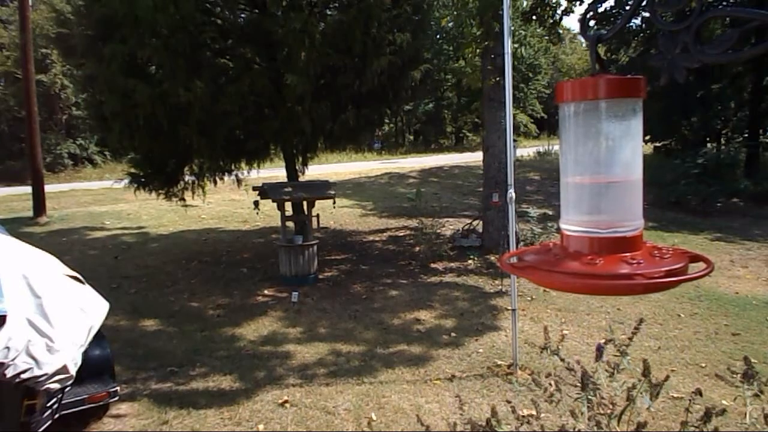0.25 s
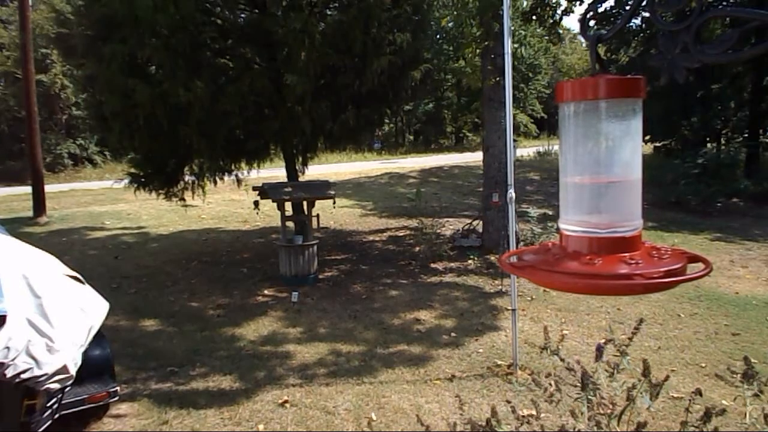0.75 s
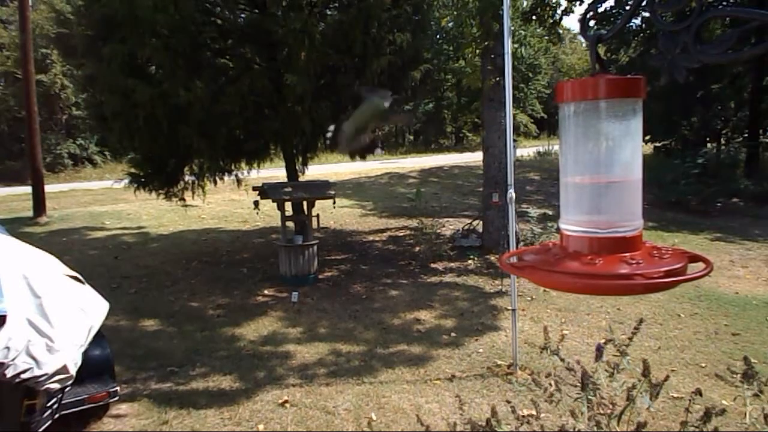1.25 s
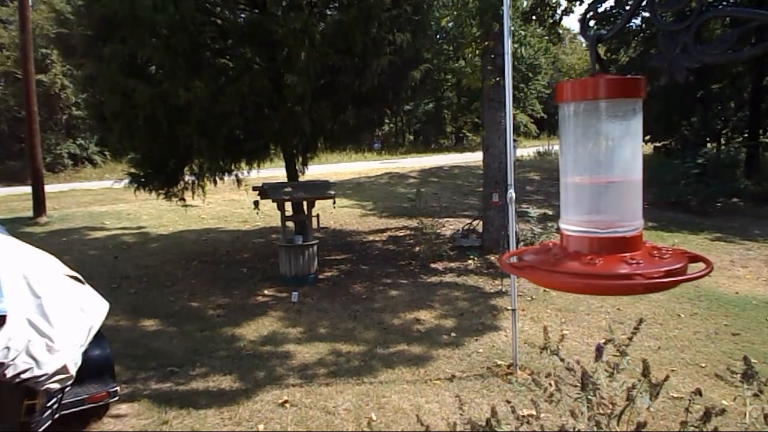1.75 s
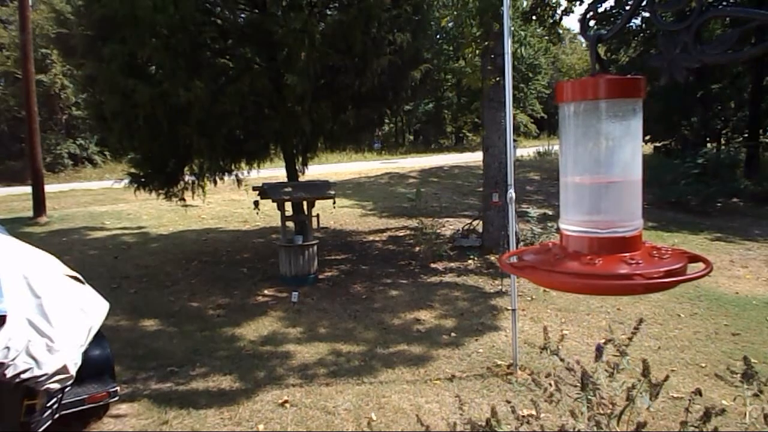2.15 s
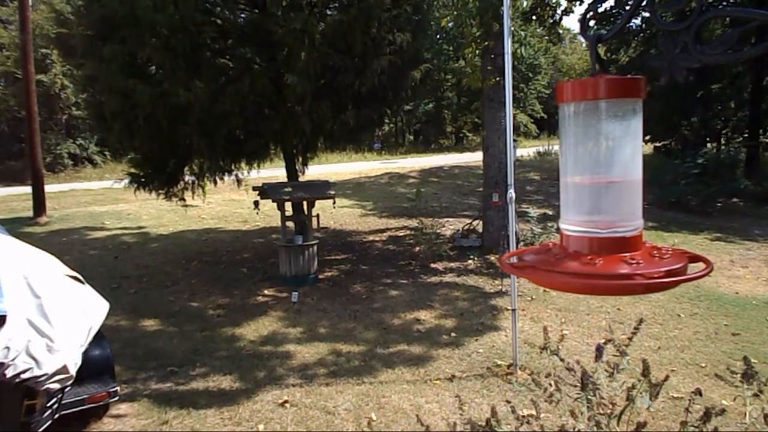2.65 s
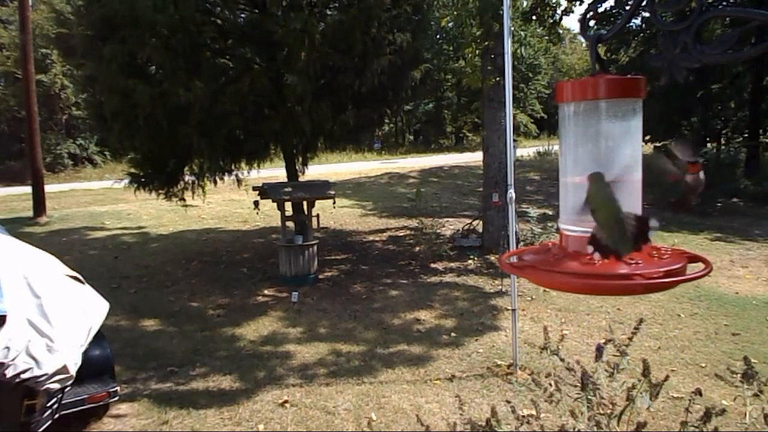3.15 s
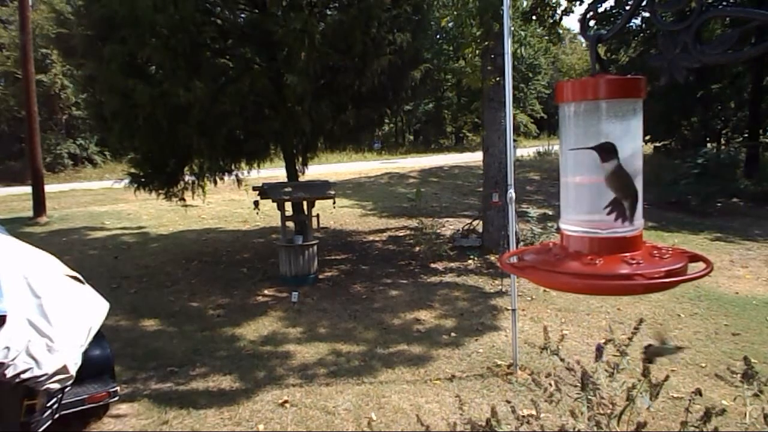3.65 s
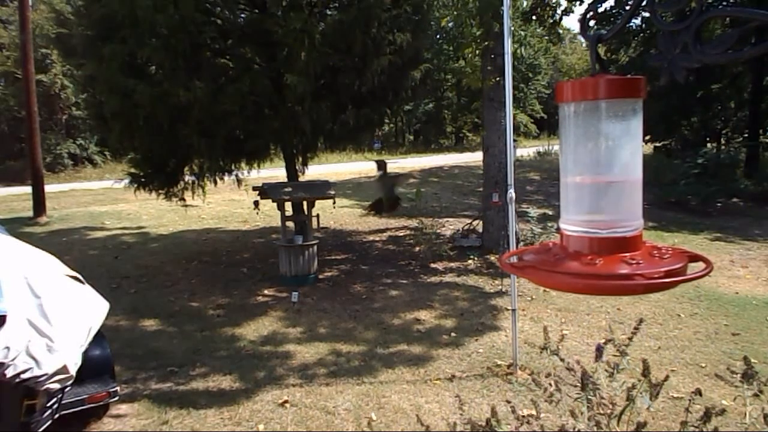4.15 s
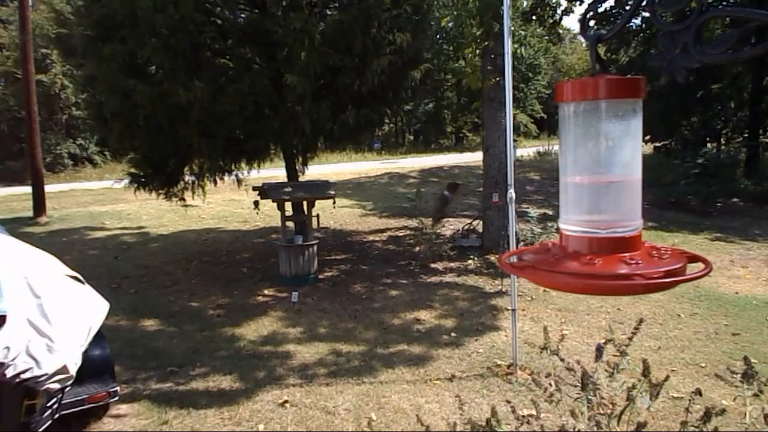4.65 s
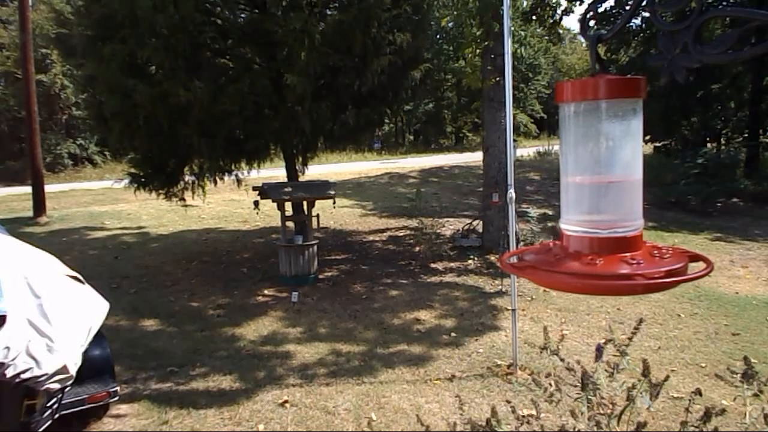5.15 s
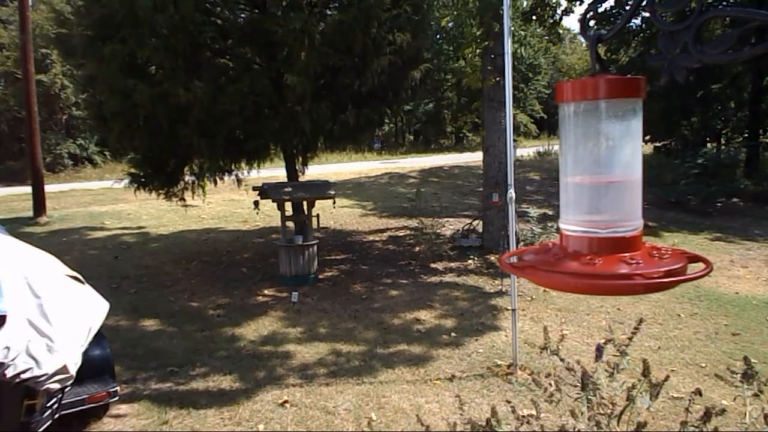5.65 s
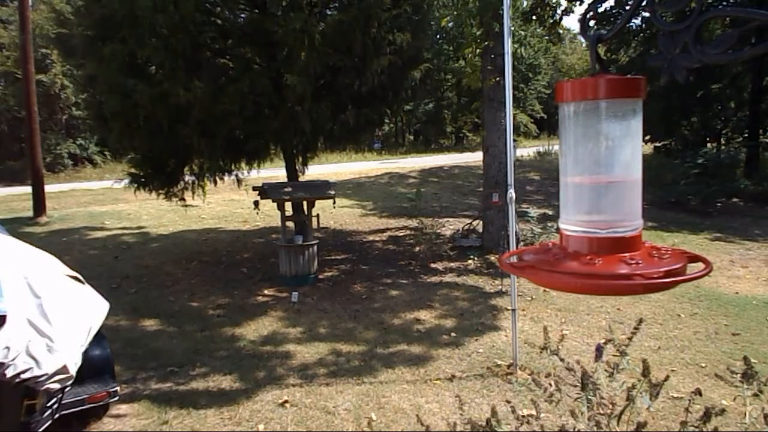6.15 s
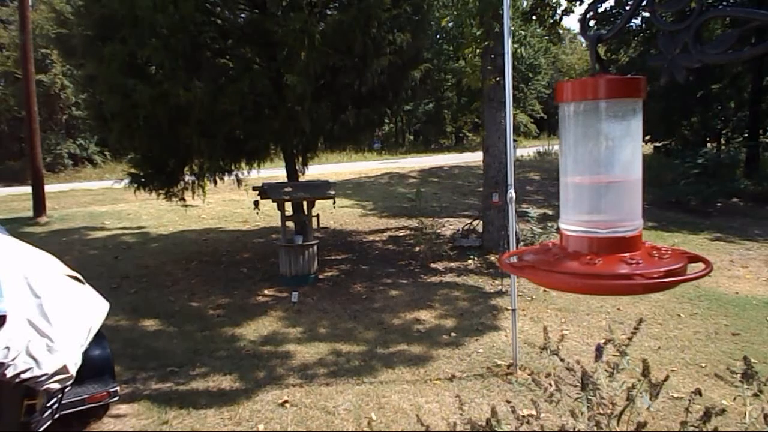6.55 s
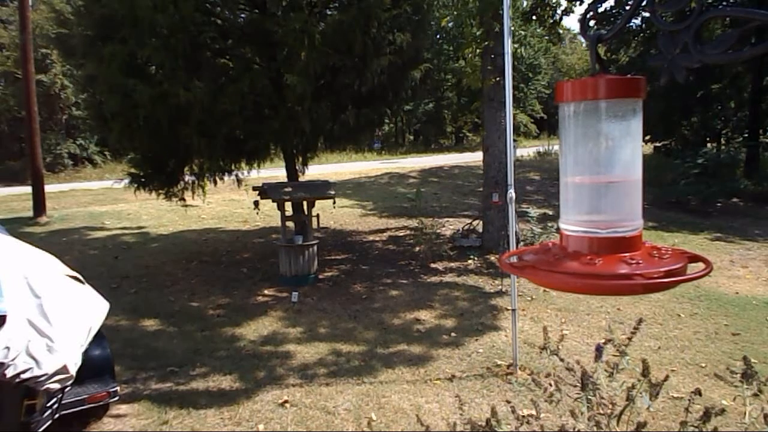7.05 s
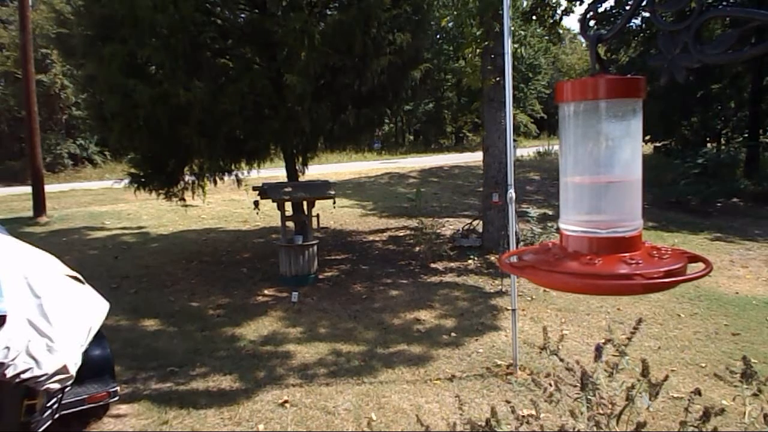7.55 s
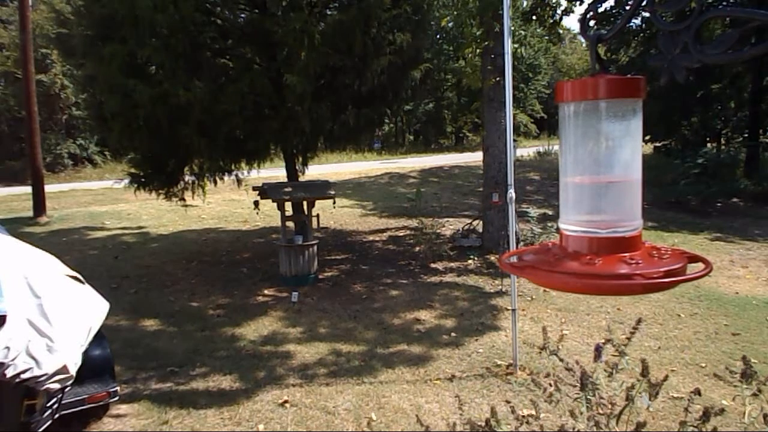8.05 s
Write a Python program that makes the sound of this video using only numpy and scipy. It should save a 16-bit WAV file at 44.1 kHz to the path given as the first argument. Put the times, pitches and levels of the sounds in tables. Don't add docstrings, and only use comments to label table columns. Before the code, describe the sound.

A quiet backyard with a soft low drone and faint leaf rustle, heard by a small camera near a feeder. Soft wing hums and a faint squeak come first; around 1 s a thin high whistle leads into a quick trill. At 1.2 s wings thrum strongly past, with a short rasping buzz, then a loud piercing squeak at 1.4 s that plunges abruptly. Creaky ticks follow at 1.6 s. The loudest call, a very fast bright trill, bursts at 1.8 s, then a buzz and six evenly spaced falling chips from 2.0 to 2.4 s. From 2.6 to 5.5 s wings hum and swish repeatedly, with small ticks near 3.5 s and one chip at 3.9 s. Around 6 to 6.5 s weak, echoing calls sound farther off; a barely audible songbird sings until 7.2 s. A low wind puff bumps the microphone at 7.5 s, then quiet leaves.

```python
import sys
import numpy as np
from scipy import signal
from scipy.fft import rfft, irfft, next_fast_len
from scipy.io import wavfile
from scipy.ndimage import uniform_filter1d, map_coordinates

SR = 44100
rng = np.random.default_rng(int(sys.argv[2]) if len(sys.argv) > 2 else 0)


def nominal_scale(level):
    x = np.asarray(level, float) / 20
    return 10 ** x


def master_out(mix):
    frames = np.transpose(np.atleast_2d(mix))
    ceiling = np.clip(frames, -1, 1)
    pcm = np.round(ceiling * 32767).astype(np.int16)
    wavfile.write(sys.argv[1], SR, pcm)


N = 365985
TIME_S = np.arange(N) / SR

# freq_hz, level_db_per_hz
DRONE_SPECTRUM = [(22, -35.5), (38, -20.5), (50, -5), (80, -4), (220, -1), (400, -4), (1200, -6.5),
                  (2000, -12), (4000, -20.5), (9000, -65)]
# freq_hz, level_db_per_hz
LEAF_SPECTRUM = [(900, -11), (1800, -4.5), (3000, 1), (5000, 1), (6800, -2.5), (8500, -9.5), (10300, -12),
                 (11200, -43.5)]
# closest_s, half_length_s, level_db
BRANCH_GUSTS = [(.05, 0.35, -62), (.9, .15, -52.5), (1.523, 0.17, -54.5), (2.248, 0.21, -56),
                (3.618, 0.38, -54), (4.52, 0.083, -51), (5.171, 0.17, -49), (5.753, 0.21, -55.5),
                (6.08, 0.11, -62), (6.521, 0.15, -53), (7.146, .12, -51.5), (7.799, .2, -62)]
# freq_hz, level_db_per_hz
BRANCH_SPECTRUM = [(900, -19.5), (1800, -4), (3000, 1.5), (4500, 0), (6500, -4.5), (8500, -13),
                   (10300, -19.5), (11200, -43.5)]
# start_s, rise_s, t60_s, noise_db, flap_hz, flap_db
WIND_PUFF = (7.47, .028, .2, -33, 76, -37)
# freq_hz, level_db_per_hz
PUFF_SPECTRUM = [(35, -21), (75, 7.5), (130, -5.5), (300, -5), (900, -18), (1600, -21.5), (3000, -54)]
# closest_s, half_length_s, beat_hz, hum_db, swish_db
WING_PASSES = [(0.081, 0.061, 52.4, -49.5, -72), (0.463, .08, 51, -52, -80), (0.94, .1, 46, -54, -65),
               (1.181, .035, 37, -38, -58), (1.32, 0.074, 46.4, -39.5, -49.5),
               (1.477, 0.099, 54.4, -43.5, -53), (1.93, 0.11, 52, -49.5, -70), (2.397, 0.057, 48, -51, -72),
               (2.698, .07, 46.3, -52, -62), (2.968, 0.086, 50, -48.5, -58),
               (3.178, 0.13, 49.8, -46.5, -55), (3.454, 0.095, 51.4, -44, -50),
               (3.664, 0.17, 50.3, -46.5, -53.5), (4.078, 0.13, 47.4, -51.5, -56),
               (4.356, .13, 52.5, -50, -55), (4.92, .12, 50, -54.5, -58.5),
               (5.298, 0.072, 52.6, -50.5, -65), (5.44, 0.049, 55, -52.5, -53.5),
               (5.977, 0.056, 52, -50, -61)]
# freq_hz, level_db
HUM_SPECTRUM = [(45, -16), (100, -3), (200, 0), (270, -4), (350, -10), (500, -14), (800, -40)]
# freq_hz, level_db_per_hz
SWISH_SPECTRUM = [(1500, -32.5), (3500, -7), (5500, 6.5), (7200, 1.5), (10500, -7.5), (11500, -46)]
OVERTONES_DB = [0, 1, 2, -1.5, -4, -9.5, -14]
# freq_hz, gain_db
THROAT_GAIN = [(1200, -22), (2000, -14), (3000, -12), (4500, -8), (5600, -2), (6600, 0), (8500, -5),
               (10200, -13), (11500, -30), (13000, -60)]
# time_s, yard_echo_db (re direct), beak_away_db_per_octave (below throat peak)
CALLER_POSITION = [(.6, -5.5, 8), (.95, -1, 1), (1.05, -17.5, 2), (1.14, -14, 3), (1.25, -26, 0),
                   (1.42, -22, -7), (1.6, -12, -0.5), (1.8, -26.5, -6), (2.0, -23.5, -2), (2.42, -23.5, 1),
                   (2.6, -11, 4), (3.5, -20, 6), (3.9, -16, 2.5), (6.05, -6.5, 2), (6.2, -2, 0.5),
                   (6.55, -5, 4.5)]
# time_s, pitch_hz, level_db
WHISTLE_CONTOURS = [
    [(0.59, 6326, -41), (0.598, 6338, -34), (0.622, 6193, -29), (0.635, 6189, -37)],
    [(0.962, 6560, -39), (0.972, 6290, -40), (0.985, 6400, -35), (0.993, 6445, -20), (1.006, 6510, -23),
     (1.011, 6535, -38), (1.015, 6550, -23), (1.031, 6620, -19), (1.039, 6540, -26)],
    [(1.385, 6886, -20), (1.393, 6857, -11), (1.409, 6700, -8), (1.428, 6720, -7), (1.436, 6715, -11)],
    [(6.0, 6440, -41), (6.012, 6434, -28), (6.046, 6584, -27), (6.07, 6591, -38)],
]
# length_s, last_pitch_hz, last_level_db
WHISTLE_PLUNGES = [
    (0.0032, 4800, -68),
    (.006, 2400, -32),
    (0.007, 2000, -14.5),
    (.007, 2500, -44),
]
# start_s, length_s, pitch_hz, level_db
CREAKY_TICKS = [(.707, 0.0046, 2000, -51.5), (1.5899, 0.0043, 1746, -29.5), (1.598, .005, 1599, -35),
                (1.604, 0.0046, 1690, -37), (1.6115, 0.0034, 1700, -38), (1.618, .004, 1700, -40),
                (1.627, 0.0026, 1920, -40), (2.6595, .002, 1900, -48), (2.664, 0.0033, 1900, -42),
                (2.937, 0.0034, 1698, -45.5), (2.959, 0.0024, 1603, -43), (3.4838, 0.0022, 2480, -31.5),
                (3.488, .004, 1596, -33.5), (3.4919, 0.0027, 1900, -34.5), (3.4955, .002, 1900, -34),
                (3.539, .0015, 2000, -43), (3.542, 0.0019, 2000, -37), (3.5464, 0.0033, 2830, -36.5),
                (3.55, 0.0023, 2000, -34), (3.668, .003, 1800, -44)]
# start_s, length_s, first_top_hz, last_top_hz, level_db
ZIGZAG_BUZZES = [
    (0.845, 0.032, 4600, 3200, -46.5),
    (1.25, 0.033, 4580, 3100, -15),
    (1.9408, 0.041, 5947, 3000, -18.5),
    (6.312, 0.03, 4594, 3100, -39.5),
]
# start_s, length_s, first_hz, last_hz, level_db
FALLING_CHIPS = [(.9355, .007, 2890, 2450, -43), (1.1754, 0.0075, 2100, 1598, -30),
                 (1.867, 0.013, 3880, 1500, -36.5), (2.023, 0.029, 3530, 1505, -17),
                 (2.085, 0.024, 3120, 1684, -17.5), (2.151, 0.024, 3090, 1610, -19),
                 (2.219, 0.024, 3010, 1610, -19.5), (2.294, 0.024, 2985, 1620, -21.5),
                 (2.38, 0.024, 2970, 1636, -21.5), (2.5656, .025, 2500, 1435, -33),
                 (3.9085, 0.022, 2563, 1490, -33), (6.417, 0.027, 3020, 1680, -42.5),
                 (6.521, .022, 2944, 1800, -43.5)]
# start_s, first_hz, top_hz, level_db
TRILL_SYLLABLES = [(1.098, 2000, 6000, -38), (1.113, 2460, 6500, -29.5), (1.125, 2466, 6400, -21.5),
                   (1.1377, 2560, 6300, -23), (1.15, 2270, 6130, -22.5), (1.1633, 2080, 5200, -26),
                   (1.7868, 5500, 6800, -17), (1.7971, 5400, 6850, -7), (1.8088, 5700, 6900, -4.5),
                   (1.821, 5200, 6850, -3), (1.8337, 4400, 6750, -2.5), (1.8462, 3100, 6600, -10),
                   (1.859, 2170, 5940, -20), (6.154, 3000, 6440, -46.5), (6.165, 2990, 6370, -38.5),
                   (6.178, 2493, 6520, -39), (6.191, 2520, 6400, -35.5), (6.204, 2400, 6340, -38.5),
                   (6.217, 2270, 5800, -46)]
# start_s, length_s, pitch_hz, rise_share, level_db
SONG_NOTES = [
    (6.03, .12, 3320, .005, -68),
    (6.39, .07, 2560, .05, -68),
    (6.565, .06, 3250, .03, -67),
    (6.62, .16, 4000, .01, -68.5),
    (6.91, .08, 2450, .08, -66),
    (7.02, .05, 2820, .04, -65),
    (7.09, .05, 3250, .02, -63),
    (7.155, .04, 3950, .015, -63),
]
# freq_hz, t60_s
YARD_DECAY = [(1500, 0.13), (6500, 0.27), (10000, 0.18)]
# freq_hz, t60_s
NEAR_DECAY = [(1500, 0.04), (10000, 0.027)]
# centre_hz, width_hz, depth_0_to_1
HOUSING_NOTCH = (7625, 465, 0.94)

DRONE_DB, LEAVES_DB = -50, -56
FAR_WINGS_DB, HOVER_BEAT_HZ = -60, 51
THROAT_PEAK_HZ = 6500
BUZZ_BOTTOM_SHARE = 0.53
SLACK_BELOW_HZ, QUICK_RISE_S, SLOW_RISE_S = 3050, 0.0044, 0.0088
SAG_HZ_PER_S = 270000
NEAR_DB, NEAR_DB_PER_YARD_DB = 3.5, 0.67
WHISTLE_NEAR_DB = -22
BAND_LIMIT_HZ, MASK_DB = 10630, -47.5


def unit(x):
    return x / np.sqrt(np.mean(x ** 2) + 1e-20)


def along(points, hz):
    f, v = np.transpose(points)
    return np.interp(np.log(hz + 1), np.log(f + 1), v, left=v[0], right=v[-1])


def wobble(rate_hz, count=N):
    knots = rng.standard_normal(int(count * rate_hz / SR) + 4)
    return map_coordinates(knots, [np.arange(count) * rate_hz / SR])


def filtered(x, response):
    m = next_fast_len(N + SR // 2)
    return irfft(rfft(x, m) * response(np.fft.rfftfreq(m, 1 / SR)), m)[..., :N]


def rush(spectrum, patchy_db):
    z = signal.stft(rng.standard_normal(N), nperseg=512)[2]
    patches = uniform_filter1d(rng.standard_normal(z.shape), size=6, axis=0)
    patches = uniform_filter1d(patches, size=14, axis=1)
    noise = signal.istft(z * nominal_scale(patchy_db * unit(patches)), nperseg=512)[1][:N]
    return unit(filtered(noise, lambda hz: nominal_scale(along(spectrum, hz))))


def swells(closest_s, half_s, level_db):
    distance = (TIME_S - closest_s[:, None]) / half_s[:, None]
    return nominal_scale(2 * level_db)[:, None] * np.exp(-distance ** 2)


def span(length_s):
    return np.linspace(0, 1, max(round(length_s * SR), 8))


def add_note(track, start_s, hz, level_db, attack_s, release_s, jitter=0.0031):
    count = len(hz)
    t = np.arange(count) / SR
    phase = 2 * np.pi * np.cumsum(hz * (1 + jitter * wobble(900, count))) / SR
    k = np.arange(1, len(OVERTONES_DB) + 1)[:, None]
    purer_db = (k - 1) * 9 * np.clip(hz / 1000 - 3.6, 0, None)
    throat_db = along(THROAT_GAIN, k * hz) - along(THROAT_GAIN, THROAT_PEAK_HZ)
    time_s, _, beak_db = np.transpose(CALLER_POSITION)
    turned_db = np.interp(start_s, time_s, beak_db) * np.log2(THROAT_PEAK_HZ / (k * hz))
    gain_db = np.c_[OVERTONES_DB] - purer_db + throat_db + turned_db
    stack = np.sum(nominal_scale(gain_db) * np.sin(k * phase), axis=0)
    gate = np.clip(t / attack_s, 0, 1) * np.clip((t[-1] - t) / release_s, 0, 1)
    flutter = nominal_scale(0.3 * wobble(300, count))
    track[round(start_s * SR):][:count] += np.sqrt(2) * nominal_scale(level_db) * flutter * gate * stack


def wind_puff():
    start_s, rise_s, t60_s, noise_db, flap_hz, flap_db = WIND_PUFF
    t = np.clip(TIME_S - start_s, 0, None)
    envelope = np.clip(t / rise_s, 0, 1) ** 2 * nominal_scale(-60 * np.clip(t - rise_s, 0, None) / t60_s)
    flap = nominal_scale(flap_db) * np.sin(2 * np.pi * flap_hz * t)
    return envelope * (nominal_scale(noise_db) * rush(PUFF_SPECTRUM, patchy_db=0.5) + flap)


def air():
    drone = nominal_scale(DRONE_DB + 0.7 * wobble(3)) * rush(DRONE_SPECTRUM, patchy_db=1.1)
    leaves = nominal_scale(LEAVES_DB + 0.16 * wobble(4.4)) * rush(LEAF_SPECTRUM, patchy_db=2.5)
    gusts = np.sqrt(swells(*np.transpose(BRANCH_GUSTS)).sum(axis=0))
    branches = gusts * rush(BRANCH_SPECTRUM, patchy_db=2.0)
    return drone + leaves + branches + wind_puff()


def wings():
    closest_s, half_s, beat_hz, hum_db, swish_db = np.transpose(WING_PASSES)
    near, far = swells(closest_s, half_s, hum_db), nominal_scale(2 * FAR_WINGS_DB)
    power = near.sum(axis=0) + far
    rate_hz = (beat_hz @ near + HOVER_BEAT_HZ * far) / power
    phase = 2 * np.pi * np.cumsum(rate_hz * (1 + 0.02 * wobble(25))) / SR
    hum = np.zeros(N)
    for k in range(1, 13):
        gain = nominal_scale(along(HUM_SPECTRUM, k * rate_hz) + 4 * wobble(11))
        hum += gain * np.cos(k * phase + 0.9 * wobble(13))
    stroke_db = 6.5 * np.cos(phase) + 4.5 * np.cos(2 * phase) + 2.5 * wobble(50)
    swish = nominal_scale(stroke_db) * rush(SWISH_SPECTRUM, patchy_db=1.5)
    swish_gain = np.sqrt(swells(closest_s, half_s, swish_db).sum(axis=0))
    return nominal_scale(-2.5) * np.sqrt(power) * unit(hum) + swish_gain * unit(swish)


def whistles(track):
    for contour, (fall_s, last_hz, last_db) in zip(WHISTLE_CONTOURS, WHISTLE_PLUNGES):
        s, hz, db = np.transpose(contour)
        held_s = s[-1] - s[0]
        t, u = s[0] + held_s * span(held_s), span(fall_s)
        drop = np.sin(np.pi / 2 * u) ** 1.6
        pitch_hz = np.r_[np.interp(t, s, hz), hz[-1] + (last_hz - hz[-1]) * drop]
        level_db = np.r_[np.interp(t, s, db), db[-1] + (last_db - db[-1]) * u]
        add_note(track, s[0], pitch_hz, level_db, 0.0015, 0.0015)


def ticks(track):
    for start_s, length_s, hz, db in CREAKY_TICKS:
        add_note(track, start_s, hz * (1 + 0.15 * span(length_s)), db, 0.0005, 0.0015, jitter=0.1)


def buzzes(track):
    for start_s, length_s, first_hz, last_hz, db in ZIGZAG_BUZZES:
        u = span(length_s)
        swings = np.cumsum(228 - 1700 * u * length_s) / SR - 0.51
        zigzag = np.arcsin(0.95 * np.cos(2 * np.pi * swings)) / np.pi + 0.5
        top_hz = first_hz + (last_hz - first_hz) * u ** 0.89
        pitch_hz = top_hz * (BUZZ_BOTTOM_SHARE + (1 - BUZZ_BOTTOM_SHARE) * zigzag)
        add_note(track, start_s, pitch_hz, db - 8 * (1 - u) ** 4, 0.002, 0.006)


def chips(track):
    for start_s, length_s, first_hz, last_hz, db in FALLING_CHIPS:
        u = span(length_s)
        slack = np.clip((2800 - first_hz) / 300, 0, 1)
        fall = 0.8 * u ** (rng.uniform(1.05, 1.35) - 0.4 * slack) + 0.2 * u ** 6
        pitch_hz = first_hz + (last_hz - first_hz) * fall
        level_db = db - 6 * (1 - u) ** 5 - (3.5 + 2.5 * slack) * u
        add_note(track, start_s, pitch_hz, level_db, 0.002, 0.0035, jitter=0.011)


def trills(track):
    for start_s, first_hz, top_hz, db in TRILL_SYLLABLES:
        rise_s = SLOW_RISE_S if first_hz < SLACK_BELOW_HZ else QUICK_RISE_S
        up = np.sin(np.pi / 2 * span(rise_s)) ** max(1.9 * top_hz / first_hz - 2.1, 0.45)
        fall_s = np.clip(0.0105 - rise_s, 0.0025, 1.3 * rise_s)
        sag_hz = SAG_HZ_PER_S * fall_s * span(fall_s) ** 2.6
        pitch_hz = np.r_[first_hz + (top_hz - first_hz) * up, top_hz - sag_hz]
        fade_db = 17 * min(first_hz / 3800, 1) ** 4.5 * np.linspace(0, 1, len(pitch_hz)) ** 0.8
        add_note(track, start_s, pitch_hz, db - fade_db, 0.0012, 0.002)


def songbird():
    far = np.zeros(N)
    for start_s, length_s, hz, rise_share, db in SONG_NOTES:
        u = span(length_s)
        count = len(u)
        pitch_hz = hz * (1 + rise_share * u + 0.0067 * wobble(155, count))
        tone = np.sin(2 * np.pi * np.cumsum(pitch_hz) / SR)
        level = nominal_scale(db + 10 + 1.2 * wobble(60, count)) * np.sin(np.pi * u) ** 0.5
        far[round(start_s * SR):][:count] += level * tone
    return far


def scatter(x, decay, onset_s, block_s=0.19):
    out, step = np.zeros(N + SR), round(block_s * SR)
    for a in range(0, N, step):
        block = x[a:a + step]
        if np.any(block):
            hz, t, z = signal.stft(rng.standard_normal(SR // 2), SR, nperseg=128)
            tail = signal.istft(z * nominal_scale(-60 * t / along(decay, hz)[:, None]), SR, nperseg=128)[1]
            tail *= np.clip(np.arange(len(tail)) / SR / onset_s, 0, 1)
            wet = signal.fftconvolve(block, tail / np.linalg.norm(tail))
            out[a:a + len(wet)] += wet
    return out[:N]


def scene():
    backdrop = air() + wings()
    pure, rough = np.zeros((2, N))
    whistles(pure)
    for call in (ticks, buzzes, chips, trills):
        call(rough)
    far = songbird()
    time_s, echo_db, _ = np.transpose(CALLER_POSITION)
    yard_db = np.interp(TIME_S, time_s, echo_db)
    yard = scatter((pure + rough) * nominal_scale(yard_db) + 0.6 * far, YARD_DECAY, onset_s=0.006)
    near_gain = nominal_scale(NEAR_DB + NEAR_DB_PER_YARD_DB * yard_db)
    near = scatter((nominal_scale(WHISTLE_NEAR_DB) * pure + rough) * near_gain, NEAR_DECAY, onset_s=0.001)
    return (pure + rough + far + yard + near + backdrop)[None]


def housing(hz):
    centre_hz, width_hz, depth = HOUSING_NOTCH
    resonance = 1j * hz * width_hz / (centre_hz ** 2 - hz ** 2 + 1j * hz * width_hz)
    return (1 - depth * resonance) * nominal_scale(-60 * np.clip((hz - BAND_LIMIT_HZ) / 1100, 0, 1))


def drop_masked(x):
    hz, _, z = signal.stft(x, SR, nperseg=1024)
    power = uniform_filter1d(np.abs(z) ** 2, size=9, axis=1)
    loud = power[:, (hz > 5500) & (hz < 7200)].max(axis=1, keepdims=True)
    draws = rng.standard_normal((len(hz) // 14 + 1, z.shape[2] // 3 + 1))
    chance = np.kron(draws, np.ones((14, 3)))[:len(hz), :z.shape[2]]
    limit = nominal_scale(2 * (MASK_DB + 4 * chance))
    masked = (power < loud * limit) & (hz[:, None] > 7300)
    return signal.istft(np.where(masked, 0.1 * z, z), SR, nperseg=1024)[1][:, :N]


def low_pass(x):
    return signal.sosfilt(signal.butter(12, 11640, fs=SR, output="sos"), x)


def record(dry):
    return low_pass(drop_masked(filtered(dry, housing)))


dry = scene()
out = record(dry)
master_out(out)
```